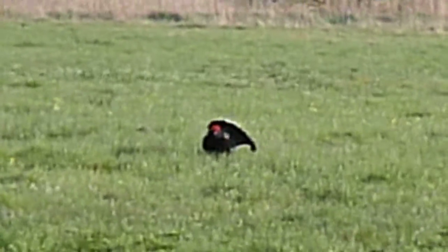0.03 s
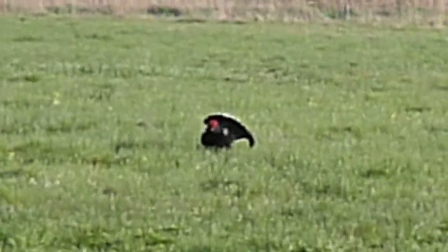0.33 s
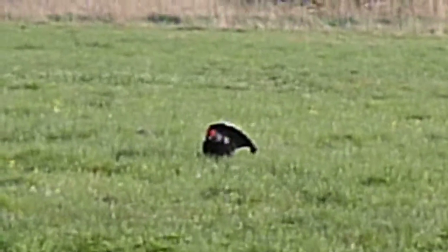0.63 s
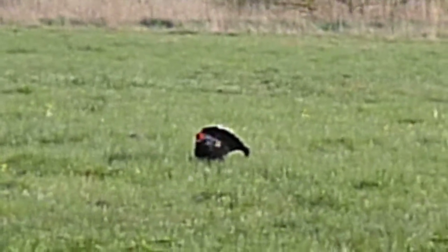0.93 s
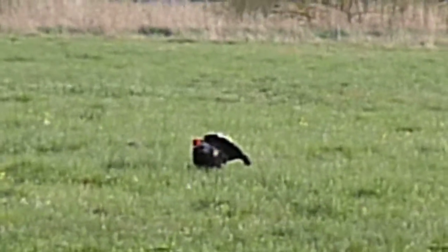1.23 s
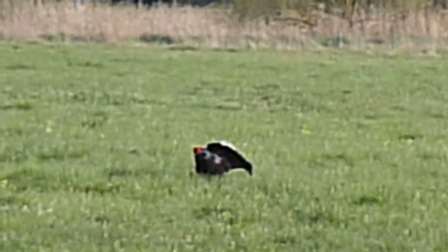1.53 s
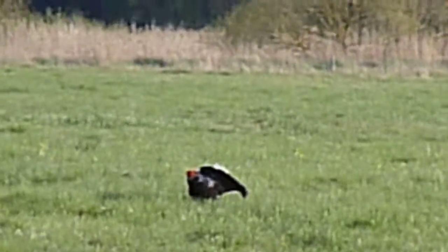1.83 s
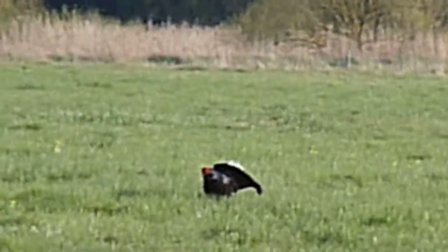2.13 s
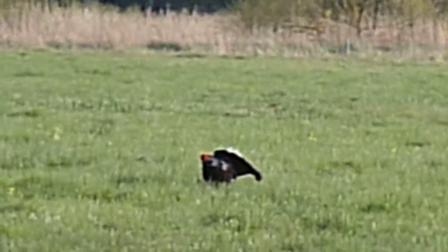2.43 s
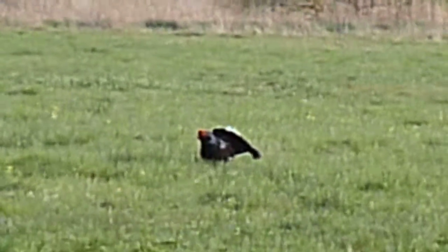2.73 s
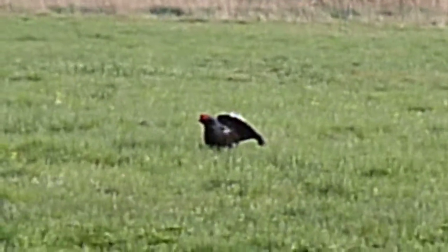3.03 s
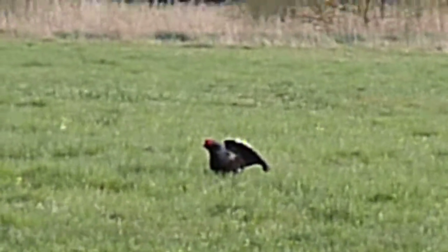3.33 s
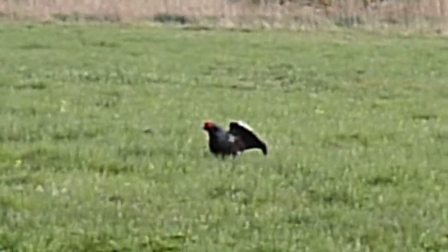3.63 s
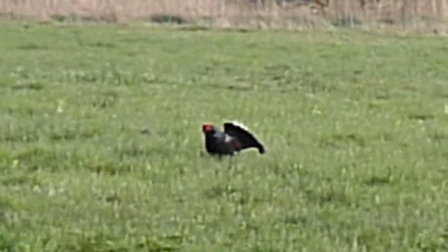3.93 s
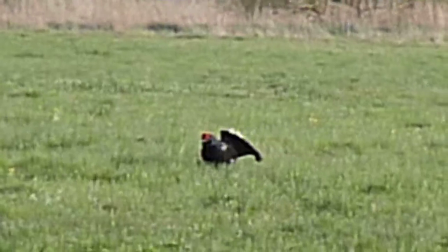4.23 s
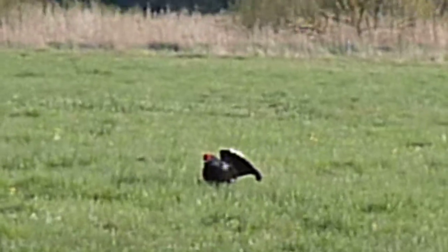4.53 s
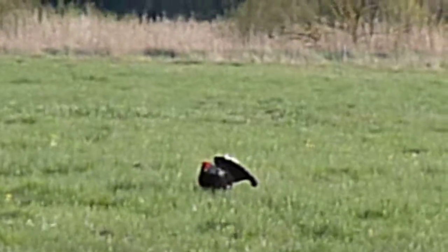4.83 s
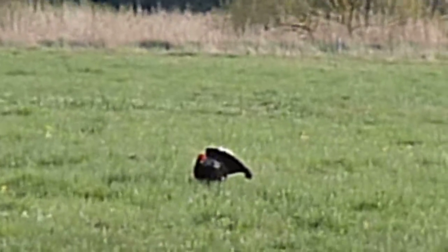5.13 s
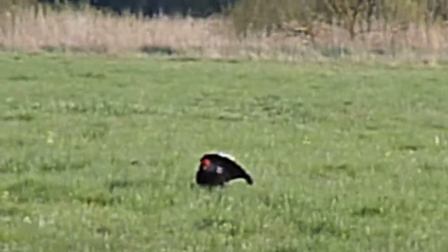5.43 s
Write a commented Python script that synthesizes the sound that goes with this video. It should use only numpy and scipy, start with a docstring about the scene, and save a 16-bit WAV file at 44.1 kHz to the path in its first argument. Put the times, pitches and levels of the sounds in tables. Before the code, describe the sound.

Faint skylarks trill and twitter over an open meadow with soft wind and handling rumble, broken by a loud double clack.

```python
"""Skylarks and other small birds whistle, trill and twitter over an open meadow in spring.
Each voice is a near-pure tone from the syrinx, modulated in frequency and amplitude.
Behind them lie a soft rush of air and the murmur of far grouse. Light wind and the holding hand
rumble at a camera's two microphone ports, and impacts in its housing make two loud clacks.
The camera's filters cut narrow notches into the treble."""
import sys
import numpy as np
from scipy import signal
from scipy.fft import rfft, irfft, next_fast_len
from scipy.io import wavfile
from scipy.ndimage import map_coordinates

SR = 44100
rng = np.random.default_rng(int(sys.argv[2]) if len(sys.argv) > 2 else 0)


def waveform_to_disk(signal):
    """Save audio, clipped to [-1, 1], as 16-bit WAV at the path in sys.argv[1]."""
    frames = np.transpose(np.atleast_2d(signal))
    scaled = np.clip(frames, -1, 1) * 32767
    samples = np.round(scaled).astype(np.int16)
    wavfile.write(sys.argv[1], SR, samples)


N = 246078


def amp(db):
    """The decibel scale: 20 dB is a factor of ten in amplitude."""
    return 10 ** (np.asarray(db) / 20)


def pan(db):
    """Level difference: a pair of gains that puts the left channel db above the right."""
    return amp([[db / 2], [-db / 2]])


def unit(x):
    """Normalisation to an rms of 1."""
    return x / np.sqrt(np.mean(x ** 2) + 1e-20)


def along(points, hz):
    """Interpolation of (frequency [Hz], level [dB]) points on a logarithmic frequency axis."""
    frequencies, levels = np.transpose(points)
    return np.interp(np.log(hz + 1), np.log(frequencies + 1), levels)


def curve(rows):
    """An envelope: (time [s], level [dB]) rows interpolated to one level per sample."""
    return np.interp(np.arange(N) / SR, *np.transpose(rows))


def wobble(rate, size=N):
    """Random modulation: a smooth curve through rate random knots a second."""
    knots = rng.standard_normal(int(size * rate / SR) + 4)
    return map_coordinates(knots, [np.arange(size) * rate / SR])


def filtered(x, response):
    """Linear filtering: the spectrum of x is multiplied by a frequency response."""
    n = x.shape[-1]
    padded = next_fast_len(n + SR // 2)
    hz = np.fft.rfftfreq(padded, 1 / SR)
    return irfft(rfft(x, padded) * response(hz), padded)[..., :n]


def noise(spectrum, channels=2):
    """Spectral shaping: coloured noise of rms 1, uncorrelated between channels."""
    white = rng.standard_normal((channels, N))
    return unit(filtered(white, lambda hz: amp(along(spectrum, hz))))


def push(spectrum, size=4096):
    """Minimum phase: the most compact causal pulse with this spectrum, of peak 1."""
    magnitude = amp(along(spectrum, np.fft.rfftfreq(size, 1 / SR)))
    cepstrum = irfft(np.log(magnitude))
    cepstrum[1:size // 2] *= 2
    cepstrum[size // 2 + 1:] = 0
    pulse = irfft(np.exp(rfft(cepstrum)))
    return pulse / np.abs(pulse).max()


def add(track, s, sound):
    """Superposition: a sound is summed into the track from time s on."""
    start = round(s * SR)
    a, b = max(start, 0), min(start + sound.shape[-1], N)
    if b > a:
        track[:, a:b] += sound[..., a - start:b - start]


def air(lift_db=.5, swell_db=0.1, hiss_db=-67):
    """Coherence: the far rush of the breeze is alike at both ports; the fine hiss is uncorrelated."""
    # Strength of the breeze: (time [s], level [dB])
    breeze = [(0.0, -62), (0.46, -64.5), (2.07, -60.5), (2.36, -61.5), (3.88, -64), (4.3, -63.5),
              (5.58, -62)]
    # Spectrum of the rush: (frequency [Hz], relative density [dB])
    rush_spectrum = [(25, -1.5), (60, 3.5), (150, 3.5), (300, 3), (650, -0.5), (950, -0.5), (1300, -6),
                     (1700, -20.5), (2400, -22.5), (5000, -39.5)]
    # Spectrum of the hiss: (frequency [Hz], relative density [dB])
    hiss_spectrum = [(50, -12), (500, 4), (1100, 4.5), (1700, 2.5), (2300, -2), (3300, -3.5), (5000, -4.5),
                     (6500, -1.5), (7400, -5), (8000, -12), (8600, -29.5)]
    rush = noise(rush_spectrum, channels=1) * amp(curve(breeze) + lift_db + swell_db * wobble(7.6))
    return rush * pan(.8) + amp(hiss_db) * noise(hiss_spectrum)


def gusts(swell_db=1.5):
    """Turbulence: stronger puffs of wind add a soft low roar."""
    # Strength of the puffs: (time [s], level [dB])
    strength = [(0, -69.5), (1, -82), (1.65, -59), (2.3, -63.5), (3.2, -67), (3.8, -74), (4.8, -72.5),
                (5.15, -64), (5.58, -70)]
    # Spectrum of the roar: (frequency [Hz], relative density [dB])
    spectrum = [(70, -25), (140, -2), (200, 1), (320, -8.5), (600, -17), (1500, -52.5)]
    return noise(spectrum, channels=1) * amp(curve(strength) + swell_db * wobble(6.3))


def rumble(rest_db=-77.5, uncorrelated=0.62, pan_db=5, bump_pan_db=9, lumps_db=2):
    """Wind and handling noise: eddies and the shifting hand shake the ports, the left one more."""
    # Swells as the hand moves: (peak time [s], half length [s], level [dB])
    hand_moves = [(0.787, 0.15, -56.5), (1.1, 0.3, -62), (1.607, .06, -58.5), (2.001, 0.23, -57.5),
                  (2.6, 0.23, -61.5), (3.4, 0.25, -70)]
    # Spectrum of the shaking: (frequency [Hz], relative density [dB])
    spectrum = [(13, -38), (22, -8), (49, 0.5), (70, 4), (178, -9), (209, -12), (300, -16.5), (390, -40),
                (660, -120)]
    # Soft bumps as the grip slips: (time [s], frequency [Hz], half length [s], level [dB])
    bumps = [(0.719, 80, 0.021, -49), (.777, 123, .016, -49.5), (.825, 72.6, .036, -47.5),
             (2.096, 93.5, 0.019, -39.5), (2.165, 88, 0.011, -46.5)]
    now = np.arange(N) / SR
    swells = sum(amp(db) * np.exp(-((now - s) / half) ** 2) for s, half, db in hand_moves)
    shake = unit(noise(spectrum, channels=1) + uncorrelated * noise(spectrum))
    out = shake * (amp(rest_db) + swells) * amp(lumps_db * wobble(14)) * pan(pan_db)
    t = np.arange(-SR // 10, SR // 10) / SR
    for s, hz, half, db in bumps:
        bump = amp(db) * np.exp(-(t / half) ** 2) * np.sin(2 * np.pi * hz * t)
        add(out, s + t[0], bump * pan(bump_pan_db))
    return out


def clacks(thud_gain_db=-6, rebound_db=-6, rebound_s=0.00199, attack_s=0.00038,
           crack_t60=0.0092, rattle_db=-34, rattle_t60=.08, spring_hz=8000, spring_t60=0.042):
    """Impact excitation: each contact thuds, rebounds, cracks and rings the shell and a small spring."""
    # Contacts in the housing: (time [s], thud [dB], crack [dB], ring [dB], spring [dB])
    contacts = [(1.7695, -40.5, -44.5, -47.5, -77), (1.797, -38.5, -44, -44, -76),
                (1.8025, -42.5, -46.5, -40.5, -74.5), (1.8077, -43, -40, -40.5, -70.5),
                (1.8143, -44, -33.5, -37, -78), (1.8354, -1, -14.5, -13, -58),
                (1.8754, -13, -10.5, -21, -41.5), (3.1688, -60, -47.5, -53, -85)]
    # Spectrum of the thud, alike at both ports: (frequency [Hz], relative level [dB])
    thud_spectrum = [(40, -31), (130, -14), (250, 3), (500, -1), (700, 2), (1050, 2.5), (1400, -7),
                     (1900, -14), (2400, -20), (4000, -31.5), (9000, -63)]
    # Spectrum of the crack: (frequency [Hz], relative level [dB])
    crack_spectrum = [(200, -12.5), (900, 6), (2000, -3.5), (3100, 4.5), (4200, -7.5), (5000, -13.5),
                      (6600, -1.5), (7600, -10.5), (8600, -33.5)]
    # Damped modes of the shell: (frequency [Hz], relative level [dB], time to fall 60 dB [s])
    modes = [(636, -18, 0.066), (856, -18, 0.065), (1083, -15.5, 0.052), (1428, 3, 0.019),
             (1520, -28.5, 0.1), (1756, -14.5, 0.028), (3650, -24, 0.026)]
    out = np.zeros((2, N))
    t = np.arange(SR // 4) / SR
    thud = amp(thud_gain_db) * push(thud_spectrum)
    attack = 1 - np.exp(-t / attack_s)
    decay = amp(-60 * t / crack_t60) + amp(rattle_db - 60 * t / rattle_t60)
    for s, thud_db, crack_db, ring_db, spring_db in contacts:
        grit = filtered(rng.standard_normal((2, len(t))), lambda hz: amp(along(crack_spectrum, hz)))
        grit = unit(grit - 0.21 * grit[::-1])  # the shell rocks, driving the ports in antiphase
        ring = sum(amp(db + rng.normal(0, 1) - 60 * t / t60) * np.sin(2 * np.pi * hz * t)
                   for hz, db, t60 in modes)
        spring = amp(spring_db - 60 * t / spring_t60) * np.sin(2 * np.pi * spring_hz * t)
        add(out, s, amp(thud_db) * thud)
        add(out, s + rebound_s, amp(thud_db + rebound_db) * thud)
        add(out, s, (amp(crack_db) * grit * decay + amp(ring_db) * ring + spring) * attack)
    return out


def grouse(hz=870, width_hz=130, bubble_db=3):
    """Narrow-band noise: distance blurs the bubbling of black grouse into a murmur."""
    # Strength of the cooing: (time [s], level [dB])
    cooing = [(0, -83.5), (1.2, -70.5), (2.4, -91), (3.3, -72.5), (3.9, -78), (4.45, -67), (4.9, -80),
              (5.58, -73.5)]
    murmur = unit(filtered(rng.standard_normal(N), lambda f: np.exp(-((f - hz) / width_hz) ** 2)))
    return murmur * amp(curve(cooing) + bubble_db * wobble(17))


def far_chorus(low_hz=2900, high_hz=4400, count=1500, db=-74):
    """Incoherent summation: the short slurs of many distant larks merge into a faint haze."""
    out = np.zeros((2, N))
    u = np.linspace(-1, 1, SR // 40)
    for when, pitch, slope, left, right in rng.uniform(0, 1, (count, 5)):
        hz = (low_hz + (high_hz - low_hz) * pitch) * (1 + .2 * (slope - .6) * u)
        turns = np.cumsum(hz) / SR + np.array([[left], [right]])
        add(out, when * N / SR, (1 - u * u) * np.sin(2 * np.pi * turns))
    return amp(db) * unit(out)


def meadow_echo(x, t60=0.39, db=-12.5):
    """Scattering: reeds and the wood's edge return a thin, exponentially decaying tail."""
    t = np.arange(SR // 2) / SR
    tail = rng.standard_normal((2, len(t))) * amp(-60 * t / t60)
    return amp(db) * signal.fftconvolve(x, tail / np.linalg.norm(tail[0]), axes=1)[:, :N]


def syrinx(hz, level, pan_db, waver=0.0044, flutter_db=1.06, port_phase=0.82, phase_spread=0.47):
    """Self-sustained oscillation: a bird's slightly unsteady tone reaches the two ports out of phase."""
    n = len(hz)
    phase = 2 * np.pi * np.cumsum(hz * (1 + waver * wobble(700, n))) / SR
    gate = signal.windows.tukey(n, 2 * 0.0013 * SR / n)  # 1.3 ms edges
    envelope = np.sqrt(2) * level * gate * amp(flutter_db * wobble(90, n))
    lead = port_phase * rng.uniform(-0.78, 1) + phase_spread * wobble(56.7, n)  # radians
    return envelope * pan(pan_db) * np.sin([phase + lead, phase - lead])


def glide(length, first_hz, last_hz, sag_hz=0):
    """A frequency sweep: a parabola whose middle hangs sag_hz below the straight path."""
    u = np.linspace(0, 1, int(length * SR))
    return first_hz + (last_hz - first_hz) * u - sag_hz * (1 - (2 * u - 1) ** 2)


def slur(hz, db, pan_db, fade_db=0, port_phase=0.73):
    """Frequency modulation: one smooth note follows a pitch path while its level drops by fade_db."""
    level = amp(db - fade_db * np.linspace(0, 1, len(hz)))
    return syrinx(hz, level, pan_db, port_phase=port_phase, phase_spread=port_phase / 2)


def trill(hz, rate, sweep_hz, db, pan_db, rough, sharpness=1.6, swell_db=4, fade_db=0):
    """Amplitude modulation: the voice opens and shuts rate times a second, and each pulse is a sweep."""
    n = len(hz)
    u = np.linspace(-1, 1, n)
    cycle = (rate * np.arange(n) / SR + .05 * wobble(70, n)) % 1  # slightly uneven timing
    pulses = np.abs(np.sin(np.pi * cycle)) ** sharpness
    level = amp(db + swell_db * (0.54 - u * u) - fade_db * u / 2)
    swept_hz = hz - sweep_hz / 2 * np.cos(np.pi * cycle)
    return syrinx(swept_hz, level * pulses, pan_db, waver=rough, flutter_db=1.5)


def scoops(period_s=.1667, flick_delay_s=0.049, flick_db=-76.5, pan_db=-2, port_phase=0.33):
    """Frequency modulation: a thin high note, repeated, dips, rises again and flicks downward."""
    # Course of the sinking run: (time [s], frequency [Hz], level [dB])
    run = [(2.215, 7150, -76), (2.7, 7040, -78), (3.05, 6680, -78), (3.38, 6400, -69), (3.55, 6330, -67.5),
           (3.75, 6120, -81)]
    out = np.zeros((2, N))
    when, pitch, level = np.transpose(run)
    flick = glide(length=.014, first_hz=6700, last_hz=5040)
    for s in np.arange(when[0], when[-1], period_s):
        hz = np.interp(s, when, pitch)
        scoop = glide(length=0.063, first_hz=hz, last_hz=hz, sag_hz=161.6)
        add(out, s, slur(scoop, np.interp(s, when, level), pan_db, port_phase=port_phase))
        add(out, s + flick_delay_s, slur(flick, flick_db, pan_db, port_phase=port_phase))
    return out


def pips(start_s=2.306, gap_s=.1595, slowing_s=.00102, count=11, db=-71, scatter_db=2):
    """A falling repetition rate: one soft low note recurs, each gap a little longer than the last."""
    out = np.zeros((2, N))
    hz = glide(length=.02, first_hz=3120, last_hz=2690, sag_hz=-40)
    for k in range(count):
        s = start_s + gap_s * k + slowing_s * k * k
        add(out, s, slur(hz, db + scatter_db * rng.standard_normal(), pan_db=-8))
    return out


def chips(pitch_scatter=0.019):
    """A downward chirp: one bird on the left repeats it, never at quite the same pitch."""
    # The bird's calls: (time [s], level [dB])
    calls = [(.06, -71), (.255, -70), (.691, -62.5), (0.827, -62), (.951, -64), (0.971, -65),
             (1.114, -69.5), (3.245, -63), (3.71, -70.5), (3.856, -67), (5.206, -62), (5.405, -63.5)]
    out = np.zeros((2, N))
    hz = glide(length=0.0184, first_hz=3880, last_hz=3047, sag_hz=-79)
    for s, db in calls:
        add(out, s, slur(hz * (1 + pitch_scatter * rng.standard_normal()), db, pan_db=8.5))
    return out


def twitters(length=.013, sweep_hz=900, scatter_db=3, spread_db=8):
    """Superposed random chirps: several birds at once make quick strokes, upward or downward."""
    # Spells: (start [s], end [s], stroke rate [1/s], lowest centre [Hz], highest centre [Hz], level [dB])
    spells = [(3.281, 3.56, 55, 3380, 5320, -66.5), (3.698, 4.15, 25, 3420, 4580, -68),
              (4.4, 5.55, 30, 3810, 5380, -71)]
    out = np.zeros((2, N))
    for start, end, rate, low_hz, high_hz, db in spells:
        for s in np.arange(start, end, 1 / rate):
            late, slope, strength, side = rng.uniform(-1.2, 1, 4)
            hz = rng.uniform(low_hz, high_hz)
            path = glide(length, hz - slope * sweep_hz / 2, hz + slope * sweep_hz / 2)
            stroke = slur(path, db + scatter_db * strength, spread_db * side)
            add(out, s + late / rate / 2, stroke * np.hanning(len(path)))
    return out


def churrs(rate=140, sweep_hz=-450):
    """Rapid pulse modulation: brief rolls of narrow downstrokes, all falling alike."""
    # Rolls: (time [s], length [s], level [dB])
    rolls = [(1.628, .038, -65), (2.158, 0.043, -64.5), (2.224, .047, -54.5), (2.984, 0.056, -59.5)]
    out = np.zeros((2, N))
    for s, length, db in rolls:
        path = glide(length, first_hz=3650, last_hz=3380)
        add(out, s, trill(path, rate, sweep_hz, db, pan_db=2, rough=0.0147))
    return out


def rattles(rate=64, sweep_hz=-800, fall_hz=150):
    """Temporal resolution: wide downstrokes, sinking a little, come slowly enough to be told apart."""
    # Rattling calls: (time [s], length [s], frequency [Hz], level [dB], left minus right [dB])
    calls = [(1.718, 0.13, 3400, -61, 1.5), (1.892, .032, 3380, -62.5, 12), (1.957, 0.05, 3390, -60, 7),
             (2.087, .11, 4940, -67.5, 7), (2.503, 0.04, 3320, -63.5, 8), (3.427, 0.1, 3870, -66.5, 3),
             (4.044, 0.031, 3630, -56.5, 2), (4.512, 0.038, 3220, -64.5, 10),
             (5.175, 0.023, 3340, -67.5, 12), (5.368, .03, 3340, -68.5, 11)]
    out = np.zeros((2, N))
    for s, length, hz, db, pan_db in calls:
        path = glide(length, hz + fall_hz / 2, hz - fall_hz / 2)
        add(out, s, trill(path, rate, sweep_hz, db, pan_db, rough=0.0261))
    return out


def buzzes(sweep_hz=900):
    """Auditory roughness: upstrokes too fast to be told apart fuse into a harsh buzz."""
    # Buzzing calls: (time [s], length [s], first pitch [Hz], last pitch [Hz], pulse rate [1/s],
    # level [dB], left minus right [dB])
    calls = [(0.671, 0.38, 4244, 4400, 85, -61.5, -4.5), (1.234, 0.42, 4370, 4460, 77, -69, -5),
             (3.539, .12, 3690, 3780, 120, -64, 1), (3.796, 0.19, 3770, 3790, 85, -69, -1),
             (4.162, .26, 3380, 3650, 127, -65, 8), (4.776, 0.16, 4120, 4220, 117, -68.5, 7)]
    out = np.zeros((2, N))
    for s, length, first, last, rate, db, pan_db in calls:
        path = glide(length, first, last)
        add(out, s, trill(path, rate, sweep_hz, db, pan_db, rough=0.04, sharpness=2.2, swell_db=3.5))
    return out


def quavers(sag_hz=90, sweep_hz=-100):
    """Tremolo: whistles that sink and settle are broken into beads of nearly steady pitch."""
    # Quavering calls: (time [s], length [s], first pitch [Hz], last pitch [Hz], pulse rate [1/s],
    # middle level [dB], fade [dB], left minus right [dB])
    calls = [(0.298, 0.24, 4030, 3636, 56, -67.5, -16, 5), (0.729, 0.056, 4050, 3750, 94, -67, 0, 12),
             (.9, 0.059, 4070, 3900, 80, -60.5, 1, 1), (1.154, 0.206, 3790, 3640, 31, -59.5, 3, 1),
             (2.833, 0.16, 4130, 3780, 48, -68, 5, 9), (2.847, .08, 4600, 4400, 50, -66, 0, 1),
             (4.615, 0.22, 4070, 3780, 69, -60.5, 14, 5)]
    out = np.zeros((2, N))
    for s, length, first, last, rate, db, fade_db, pan_db in calls:
        path = glide(length, first, last, sag_hz)
        add(out, s, trill(path, rate, sweep_hz, db, pan_db,
                          rough=0.021, sharpness=1.7, swell_db=1.5, fade_db=fade_db))
    return out


def whistles(sag_hz=80):
    """Slow frequency modulation: clear notes glide along a shallow arc, most of them fading."""
    # Whistled notes: (time [s], length [s], first pitch [Hz], last pitch [Hz], starting level [dB],
    # fade [dB], left minus right [dB])
    notes = [(1.866, 0.15, 4210, 3990, -67, -2, -1), (2.048, 0.054, 4830, 4700, -67.5, 5, 5),
             (2.194, 0.069, 4510, 3810, -68.5, -8, 2), (2.489, .085, 4340, 4030, -68, 1.5, 4),
             (2.795, 0.039, 5150, 4950, -70, 1, 7), (3.071, 0.17, 3300, 2883, -52.5, 18, 8),
             (3.273, 0.026, 4120, 4560, -65, 5, 3), (3.376, 0.033, 5250, 4620, -65, 3, -2),
             (3.646, 0.057, 4030, 3770, -61, 1, 0.5), (3.74, 0.031, 4080, 4450, -72, 3, 0),
             (3.816, .16, 3890, 4340, -71, 4, -4), (4.572, 0.032, 5520, 4740, -61.5, 0.5, 8.5),
             (4.946, .073, 3900, 4200, -62, 4.5, 1), (5.14, .057, 3980, 4120, -65.5, 1, 0)]
    out = np.zeros((2, N))
    for s, length, first, last, db, fade_db, pan_db in notes:
        add(out, s, slur(glide(length, first, last, sag_hz), db, pan_db, fade_db))
    return out


def skylark(period_s=.0988, lift_db=2,
            tick_hz=7250, tick_sweep_hz=1400, tick_delay_s=.046, tick_length_s=0.0086, scatter=0.011):
    """Periodic frequency modulation: a lark repeats a hooked slur and a high tick ten times a second."""
    # Shape of the hook: (time from its top [s], frequency [Hz], relative level [dB])
    hook = [(-.035, 4766, -27), (-.02, 5030, -17), (-.01, 5350, -15), (-.003, 5860, -6.5), (0, 6260, 4),
            (.004, 5940, -7), (.009, 4730, -7)]
    # Runs of song: (first hook [s], end [s])
    runs = [(-.041, .6), (4.247, 5.5)]
    # Strength of the song: (time [s], hook level [dB], tick level [dB])
    strength = [(0, -62.5, -60), (.3, -56.5, -62), (.5, -60.5, -62), (.6, -61.5, -80), (4.25, -69.5, -78),
                (4.65, -73, -70.5), (4.9, -67, -61.5), (5.25, -66.5, -60), (5.5, -66, -68.5)]
    out = np.zeros((2, N))
    knots, hook_hz, shape_db = np.transpose(hook)
    when, hook_db, tick_db = np.transpose(strength)
    t = np.arange(knots[0], knots[-1], 1 / SR)
    u = np.linspace(-1, 1, int(tick_length_s * SR))
    for s in np.concatenate([np.arange(start, end, period_s) for start, end in runs]):
        hook_level = amp(np.interp(s, when, hook_db) + lift_db + np.interp(t, knots, shape_db))
        add(out, s + knots[0], syrinx(np.interp(t, knots, hook_hz), hook_level, pan_db=-1.0))
        # The tick swoops down and up, loudest at the bottom.
        swoop = (tick_hz + tick_sweep_hz * u * u) * (1 + scatter * rng.standard_normal())
        tick_level = amp(np.interp(s + tick_delay_s, when, tick_db) + lift_db) * (1 - u * u)
        add(out, s + tick_delay_s - tick_length_s / 2, syrinx(swoop, tick_level, pan_db=-3.5))
    return out


def scene():
    """Superposition: birdsong, its echo, moving air and handling noise add at the two ports."""
    notes = skylark() + scoops() + pips() + chips() + whistles() + twitters()
    birds = notes + quavers() + buzzes() + rattles() + churrs() + far_chorus()
    return birds + meadow_echo(birds) + grouse() + air() + gusts() + rumble() + clacks()


def record(dry):
    """Band-stop and low-pass filtering: the camera cuts narrow notches and the top of the treble."""
    # The camera's notch filters: (frequency [Hz], width [Hz])
    notches = [(2600, 406), (4590, 250), (5430, 230), (7900, 196), (8100, 57)]
    cutoff_hz = 8800

    def response(f):
        """Filters in cascade multiply: second-order notches, then a steep low-pass."""
        stops = [(hz * hz - f * f) / (hz * hz - f * f + 1j * f * width) for hz, width in notches]
        return np.prod(stops, axis=0) / np.sqrt(1 + (f / cutoff_hz) ** 120)

    return filtered(dry, response)


dry = scene()
out = record(dry)
waveform_to_disk(out)
```